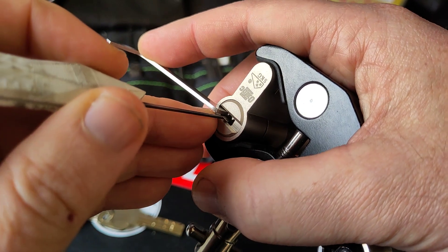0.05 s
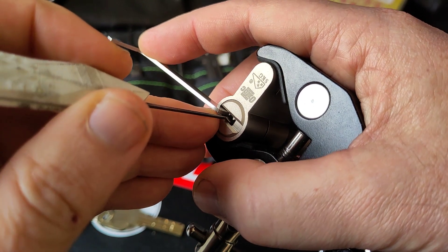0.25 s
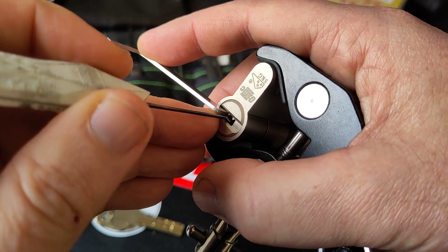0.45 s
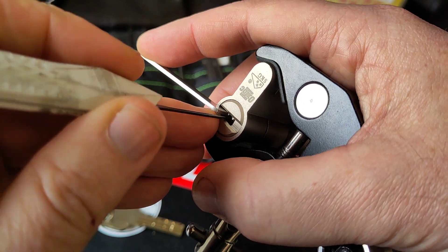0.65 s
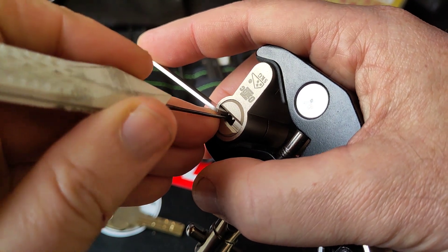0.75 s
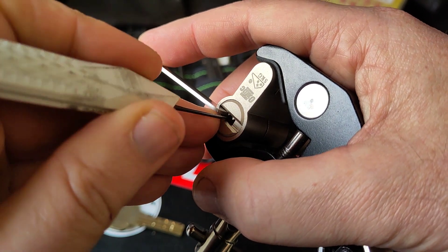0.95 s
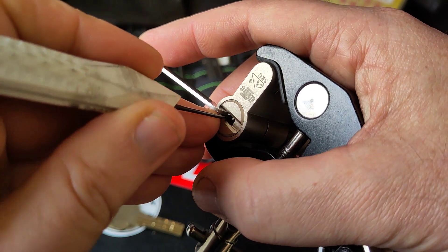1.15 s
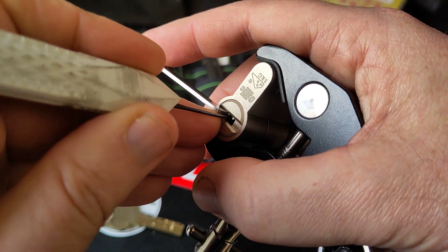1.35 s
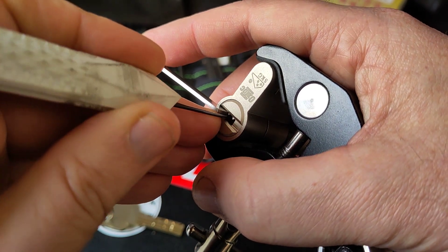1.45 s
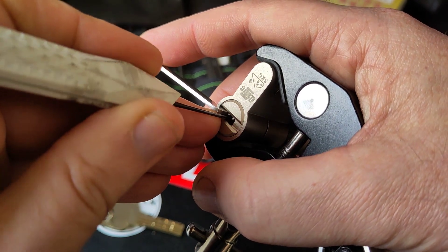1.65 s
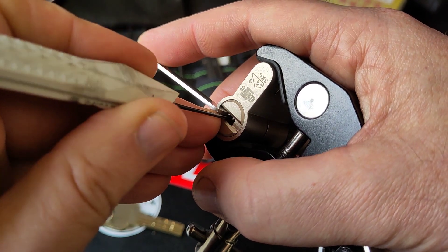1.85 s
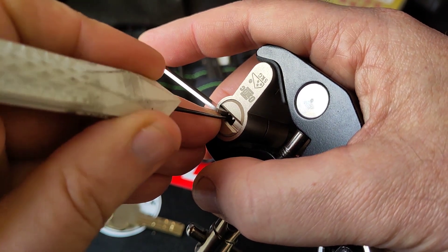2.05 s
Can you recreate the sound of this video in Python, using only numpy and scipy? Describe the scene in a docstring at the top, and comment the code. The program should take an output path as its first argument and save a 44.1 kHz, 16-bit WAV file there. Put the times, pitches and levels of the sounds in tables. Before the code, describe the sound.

A steel pick ticks and scrapes softly inside a hand-held lock cylinder. One pin sets with a louder click and a soft knock, then lighter ticks follow. Close, slightly to the left, in a small quiet room.

```python
"""A steel pick in a hand-held lock cylinder, close to the left microphone, in a small room.
Over hiss and the low rumble of working hands, the pick scrapes and the first pins slip, each a tiny snap
that rings the metal for a few milliseconds and leaves the pick's blade singing faintly.
About a second in, one pin sets with a loud click and a soft knock of lock body and table.
A few lighter clicks and two faint knocks follow."""
import sys
import numpy as np
from scipy import signal
from scipy.fft import rfft, irfft
from scipy.io import wavfile

SR = 44100
rng = np.random.default_rng(int(sys.argv[2]) if len(sys.argv) > 2 else 0)


def digitize_waveform(pressure):
    """Quantize a signal to 16-bit integers and store it at the path in sys.argv[1].

    Rows of a 2-D input are taken as channels; values are limited to [-1, 1].
    """
    field = np.atleast_2d(pressure).T
    bounded = np.clip(field, -1, 1)
    quanta = np.round(bounded * 32767).astype(np.int16)
    wavfile.write(sys.argv[1], SR, quanta)


N = 92610

# modes of pick and cylinder: pitch_hz, left_db, right_db, t60_s
METAL_MODES = [(7160, -28, -15, 0.014), (7820, -6, -28, 0.0052), (8330, -5.5, -13, 0.0065),
               (8860, -1, -34, 0.0049), (10420, -5, -2, 0.006), (11240, -5.5, -22, .006),
               (11900, -1, -23, 0.0051), (13460, -13, -19, 0.0062), (14800, -7, -2, 0.0022),
               (14650, 1.5, -9, .005), (15000, -7, -10, 0.0046)]


def amp(db):
    return 10 ** (np.asarray(db) / 20)


def add(track, start_s, sound):
    """Mix a sound into a track."""
    i = int(start_s * SR)
    track[..., i:i + sound.shape[-1]] += sound[..., :N - i]


def fade(t, t60):
    """Exponential decay, 60 dB down at t60."""
    return np.exp(-np.log(1000) * t / t60)


def colour(x, table):
    """Filter by rows of (freq_hz, gain_db) or (freq_hz, left_db, right_db)."""
    hz, *sides = np.array(table, float).T
    log_hz = np.log(np.maximum(np.fft.rfftfreq(x.shape[-1], 1 / SR), 1e-3))
    gain = amp([np.interp(log_hz, np.log(hz), db) for db in sides])
    return irfft(rfft(x) * gain, x.shape[-1])


def envelope(table):
    """One gain curve for each level column in rows of (time_s, level_db, ...)."""
    times, *levels = np.array(table).T
    return np.array([amp(np.interp(np.arange(N) / SR, times, db)) for db in levels])


def spread(pair, side_db=-4):
    """Turn a mid and a side signal into left and right."""
    return pair[0] + amp(side_db) * pair[1] * np.array([[1], [-1]])


def background():
    """Rumble of room and hands reaches both microphones, under their unrelated hiss."""
    # low rumble of the room: freq_hz, level_db
    rumble_colour = [(20, -76), (60, -86), (110, -89), (145, -93.5), (168, -91.5), (195, -93.5), (230, -91),
                     (300, -101), (360, -99), (600, -106), (2000, -130)]
    # room air and microphone hiss: freq_hz, left_db, right_db
    hiss_colour = [(100, -101, -101), (304, -100, -101), (577, -101, -102), (1130, -102, -104),
                   (1960, -104, -106.5), (2960, -107, -108), (4970, -110, -110), (4940, -107.5, -110.5),
                   (5130, -112, -111), (7050, -114, -112), (8200, -117, -116), (8900, -112.5, -117),
                   (10100, -115, -118), (13000, -113, -115), (13800, -110.5, -111), (15200, -111, -111.5),
                   (15850, -140, -140)]
    # drift of those two: time_s, rumble_db, hiss_db
    drift = [(0, 0, 1.5), (.3, 0, -2), (.45, -0.5, 0.7), (.75, 3, 2), (.95, 1, .5), (1.25, 1.5, 1),
             (1.4, 0, 0), (1.6, -4.5, -2), (1.7, -1, 0), (2.1, -1, -1.5)]
    # deep rumble of handling: freq_hz, level_db
    handling_colour = [(4, -68), (12, -69), (20, -71), (33, -82.5), (52, -79.5), (75, -93), (120, -100),
                       (300, -125)]
    # its swells: time_s, gain_db
    handling_level = [(0, 7), (.13, -17), (.33, -12), (.385, 2), (.5, -3.5), (.62, -1.5), (.8, 1.5),
                      (.94, -12), (.99, 13.5), (1.08, -2.5), (1.26, -6), (1.42, -3.5), (1.58, -6.5),
                      (1.66, -1.5), (1.84, -1), (1.95, -6), (2.1, 0.5)]
    # band of hiss near 1.9 kHz in the left microphone: freq_hz, level_db
    band_colour = [(900, -120), (1500, -102), (1880, -95), (2200, -101), (2800, -120)]
    # its drift: time_s, gain_db
    band_level = [(0, 2.5), (.2, -1.5), (.42, 0), (.8, 1), (1.25, 0), (1.6, -4), (1.7, 2), (2.1, -2.5)]
    noise = rng.standard_normal((7, N)) * np.sqrt(SR / 2)  # unit power per Hz
    rumble_gain, hiss_gain = envelope(drift)
    rumble = spread(colour(noise[:2], rumble_colour)) * rumble_gain
    handling = spread(colour(noise[2:4], handling_colour)) * envelope(handling_level)
    hiss = colour(noise[4:6], hiss_colour) * hiss_gain
    band = colour(noise[6], band_colour) * envelope(band_level) * np.array([[1], [0]])
    return (rumble + handling) * amp([[.6], [-.6]]) + hiss + band


def hand_sway(rate_hz=4.5, unevenness=0.191):
    """The working hands rock slowly and unevenly, a swell below the rumble."""
    # strength of the rocking: time_s, level_db
    sway_level = [(0, -60), (.33, -55), (.39, -30.5), (.5, -50), (.6, -35), (.75, -37), (.93, -53.5),
                  (1.1, -33), (1.22, -33.5), (1.36, -53.5), (1.6, -44.5), (1.8, -39), (2.0, -65.5)]
    t = np.arange(N) / SR
    knots = np.arange(0, t[-1] + 1, 1 / rate_hz)
    wander = np.interp(t, knots, rng.standard_normal(N)[:len(knots)])
    hz = rate_hz * np.exp(unevenness * wander)
    return envelope(sway_level) * np.sin(2 * np.pi * np.cumsum(hz) / SR)


def room(x, t60_s=0.3, delay_s=0.0071, gain_db=-25):
    """The small room stores the energy of each click and gives it back as a smooth fading wash."""
    # colour of the room's tail: freq_hz, left_db, right_db
    tail_colour = [(300, 3, 1), (2000, -12, -3), (3460, -10, -26), (5500, 10, 1), (6650, -45, -4),
                   (8100, 2, 9), (9500, -2, -3), (9800, 9, -7), (11500, 4, 0), (13000, 2, 8.5),
                   (15200, 7, -6), (16200, -22, -25)]
    t = np.arange(SR // 2) / SR
    decay = fade(t, t60_s) ** 2 * (t > delay_s)
    energy = np.abs(signal.fftconvolve(x ** 2, decay / decay.sum())[:N])
    return amp(gain_db) * colour(rng.standard_normal((2, N)) * np.sqrt(energy), tail_colour)


def near_reflections(x, t60_s=.028, delay_s=.0014, gain_db=-18):
    """Hands and table, close by, scatter a short diffuse tail, different at each microphone."""
    # colour of the reflections: freq_hz, left_db, right_db
    echo_colour = [(300, 2, 2), (3000, 5, 5), (5500, 3, 4), (7300, -1, 1), (8700, -1, -7), (9600, -2, -13),
                   (11500, -3, -11), (15000, 1, -1)]
    t = np.arange(SR // 2) / SR
    tail = rng.standard_normal((2, len(t))) * fade(t, t60_s) * (t > delay_s)
    tail *= amp(gain_db) / np.sqrt(np.sum(tail ** 2, axis=1, keepdims=True))
    return colour(signal.fftconvolve(x[None], tail, axes=1)[:, :N], echo_colour)


def blade(x, gain_db=-25.5, right_db=-7):
    """Every snap and scrape leaves the pick's blade singing faintly."""
    # lasting modes of the free blade: pitch_hz, level_db, t60_s
    blade_modes = [(7160, -42, .2), (7960, -31, .2), (8410, -29, .15), (8555, -30, .15), (8665, -30, .15),
                   (8985, -30, .2), (9165, -33, .15), (11000, -33, .14), (11400, -30, .16)]
    t = np.arange(SR // 3) / SR
    response = sum(amp(db) * np.sin(2 * np.pi * hz * t + rng.uniform(0, 2 * np.pi, (2, 1))) * fade(t, t60)
                   for hz, db, t60 in blade_modes)
    response *= amp([[gain_db], [gain_db + right_db]]) / np.sqrt(np.sum(response[0] ** 2))
    return signal.fftconvolve(x[None], response, axes=1)[:, :N]


def knocks(thud_t60_s=0.021, body_lag_s=.002, table_lag_s=.009, pivot_hz=230, rise_cycles=.6):
    """The jolt of a setting pin: a dull contact, a thump of the lock body, then the table rings on."""
    # knocks of the lock in the hand: start_s, level_db, tilt_db_per_octave, thud_db
    jolts = [(0.9795, -38.5, 2.5, -1), (1.4890, -54, 2, 8), (1.7284, -57.5, 6, -11)]
    # colour of the dull contact: freq_hz, gain_db
    thud_colour = [(100, -1), (250, -8), (900, 4.5), (1400, -13), (2600, -11), (4000, -30)]
    # hand-damped modes of the lock body: pitch_hz, level_db, t60_s
    body_modes = [(128.5, -3, 0.061), (218.5, 6, 0.04), (353, -9.5, 0.045), (546, -13, 0.043),
                  (857, -18, 0.029)]
    # longer modes of the table beneath: pitch_hz, level_db, t60_s
    table_modes = [(166.7, -7, .24), (231.8, -6.5, 0.21), (269, -13, 0.17)]
    out, t = np.zeros(N), np.arange(SR // 2) / SR
    for start, db, tilt, thud_db in jolts:
        thud = colour(rng.standard_normal(len(t)), thud_colour)[0] * fade(t, thud_t60_s)
        add(out, start, amp(db + thud_db) * thud)
        for modes, lag_s in (body_modes, body_lag_s), (table_modes, table_lag_s):
            for hz, mode_db, t60 in modes:
                size = amp(db + mode_db + tilt * np.log2(hz / pivot_hz))
                rise = 1 - np.exp(-t * hz / rise_cycles)
                add(out, start + lag_s, size * np.sin(2 * np.pi * hz * t) * rise * fade(t, t60))
    return out * amp([[0], [-1.5]])


def ring(modes, colour_db, t60_factor, contact_s=0.00019, detune=0.0016):
    """One snap rings the metal: modes in phase at the near microphone, scattered at the far one."""
    # the four points of the spectrum that colour_db sets: freq_hz
    colour_hz = [7500, 8900, 11500, 14700]
    t = np.arange(SR // 20) / SR
    out = np.zeros((2, len(t)))
    for hz, left_db, right_db, t60 in modes:
        hz = hz * (1 + detune * rng.standard_normal())
        phase = np.array([[0], [rng.uniform(0, 2 * np.pi)]])
        size = amp(np.interp(hz, colour_hz, colour_db)) * amp([[left_db], [right_db]])
        out += size * np.sin(2 * np.pi * hz * (t - contact_s) + phase) * fade(t, t60 * t60_factor)
    return out * (1 - np.exp(-t / contact_s))


def scrapes(slips_per_s=4000):
    """Dense tiny slips swell and fade while the pick drags, ringing pick and cylinder."""
    # drags over a pin: start_s, length_s, level_db, swell_share (of the length)
    drags = [(0.054, 0.049, -73.5, 0.56), (0.379, 0.038, -74, .2), (0.67, 0.049, -72.5, 0.57),
             (0.821, 0.04, -59, 0.23), (0.844, 0.049, -71, .15), (0.931, 0.048, -65, 0.96)]
    # colour of the dragging contact: freq_hz, gain_db
    drag_colour = [(6000, 3), (8400, 5), (9100, 4.5), (9900, -12), (11200, 7.5), (12500, -10), (14000, -1),
                   (15200, -8)]
    out = np.zeros((2, N))
    for start, length, db, swell in drags:
        chance, size = rng.random(N), rng.standard_normal(N)
        n = int(length * SR)
        force = np.interp(np.arange(n) / n, [0, swell, 1], [0, 1, 0])
        slips = (chance[:n] < slips_per_s / SR) * size[:n] * force
        response = ring(METAL_MODES, colour_db=[0, 0, -3, -6], t60_factor=0.92)
        sound = colour(signal.fftconvolve(slips[None], response, axes=1), drag_colour)
        left_rms = np.sqrt(np.sum(sound[0] ** 2) / n + 1e-18)
        add(out, start, sound * amp(db) / left_rms)
    return out


def pin_clicks(crack_t60_s=0.02):
    """Each slipping pin rings pick and cylinder, shakes the tension wrench and adds a dry crack."""
    # pin slips: start_s, level_db, low_db, mid_db, top_db, crack_db, wrench_db, t60_factor
    # (low, mid and top colour the ring near 7.5, 11.5 and 14.7 kHz)
    clicks = [(0.366, -46, -31, 4, 0, -7, -6, 2), (0.6471, -36, -4.5, -35, 0.5, -25.5, -34, 1.24),
              (0.694, -58, 6, -15, -8, -18, -23, 1.7), (.7630, -57, 7, -4, -16, -17, -20, 1.2),
              (0.8239, -50, 5, -4, -13, -17, -20, 1.4), (0.8282, -40.5, 1, -6, -27, -17.5, -19, 0.75),
              (.8312, -54, 0, -10, -15, -18, -6, 1.9), (0.9695, -49, 3, 6, -14, -31, -28, 2.3),
              (0.972, -34.5, 0.5, -4, -19, -34, -49, 2.8), (0.9789, -42, 0, 17, -4, 2.5, -34, 0.92),
              (0.9791, -26.5, -6, 16, 1.5, -9, -13.5, 0.88), (1.337, -41, -6, -17, -14, -23, -32, 1.2),
              (1.489, -57, -2, -2, -4, -7, -3, 1.04), (1.568, -60, 0, -9, -8, -5.5, -14, 1.1),
              (1.7224, -53, 2, 8.5, -12, -14, -11, 1.04)]
    # colour of the broad crack: freq_hz, left_db, right_db
    crack_colour = [(690, -0.5, -5), (1410, -8.5, -17), (2980, -1, -5.5), (5040, -6.5, 5.5),
                    (6040, -1.5, -1), (9400, 12, -21), (12000, -8, -3), (16000, -11, -5)]
    # modes of the tension wrench: pitch_hz, left_db, right_db, t60_s
    wrench_modes = [(2640, -15, -11, .005), (3330, -12, -6.5, 0.01), (4000, -9.5, -8, 0.0029),
                    (4750, -18, -12, 0.0014), (5260, 0, -11, 0.0038), (6200, -24, 1, 0.0029),
                    (7400, -18, -13, 0.0077)]
    out, t = np.zeros((2, N)), np.arange(SR // 20) / SR
    for start, db, low_db, mid_db, top_db, crack_db, wrench_db, t60_factor in clicks:
        crack = colour(rng.standard_normal((2, len(t))), crack_colour) * fade(t, crack_t60_s * t60_factor)
        pick = ring(METAL_MODES, [low_db, 0, mid_db, top_db], t60_factor)
        wrench = ring(wrench_modes, [0, 0, 0, 0], t60_factor)
        add(out, start, amp(db) * (pick + amp(wrench_db) * wrench + amp(crack_db) * crack))
    return out


def scene():
    """The lock up close with its ring and reflections, the knocks, the hands and the quiet room."""
    metal = pin_clicks() + scrapes()
    left = metal[0]
    return metal + near_reflections(left) + room(left) + knocks() + background() + blade(left) + hand_sway()


def record(dry, top_hz=16500):
    """The recorder cuts the top with a steep low-pass."""
    return signal.sosfilt(signal.ellip(10, .1, 80, top_hz, fs=SR, output="sos"), dry)


dry = scene()
out = record(dry)
digitize_waveform(out)
```